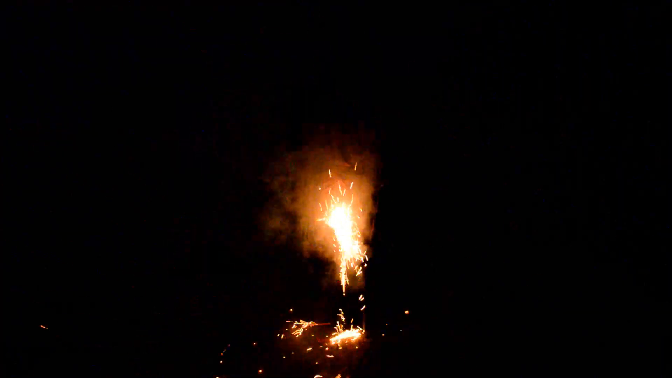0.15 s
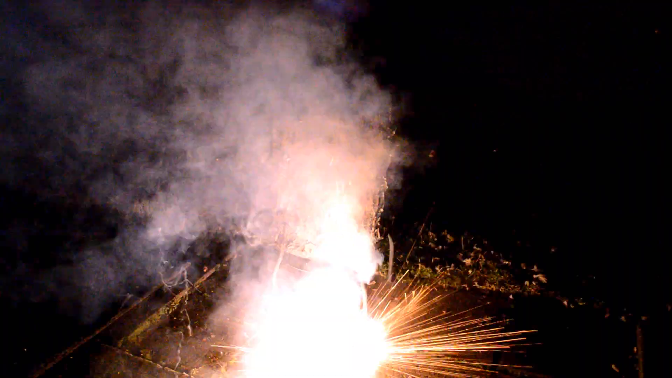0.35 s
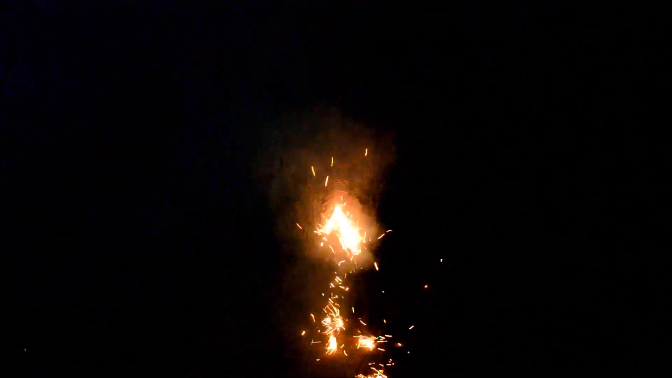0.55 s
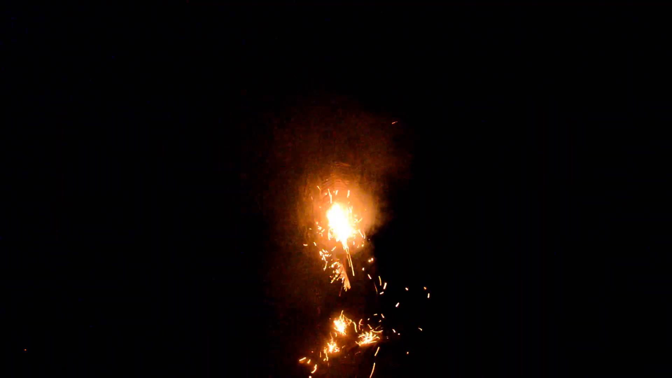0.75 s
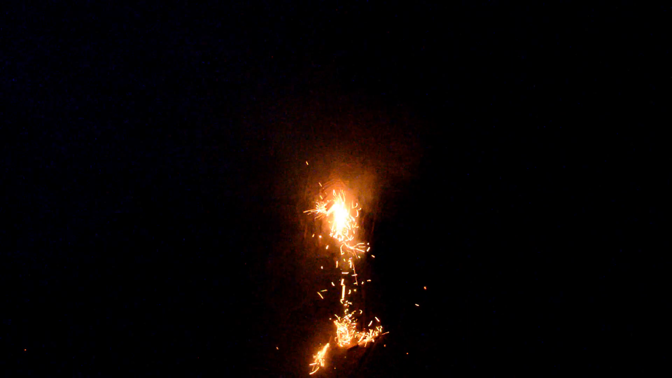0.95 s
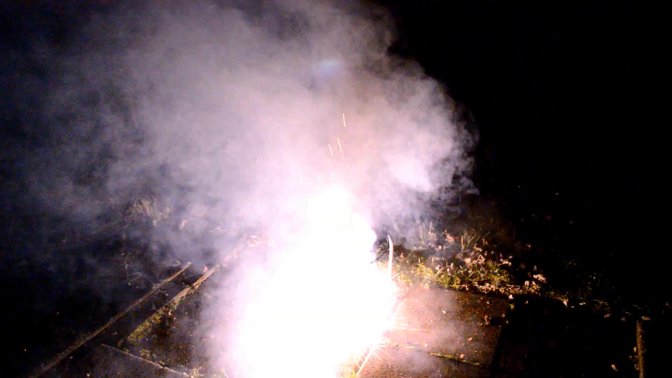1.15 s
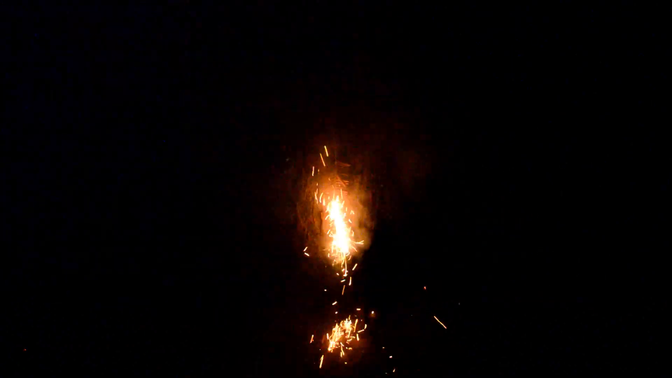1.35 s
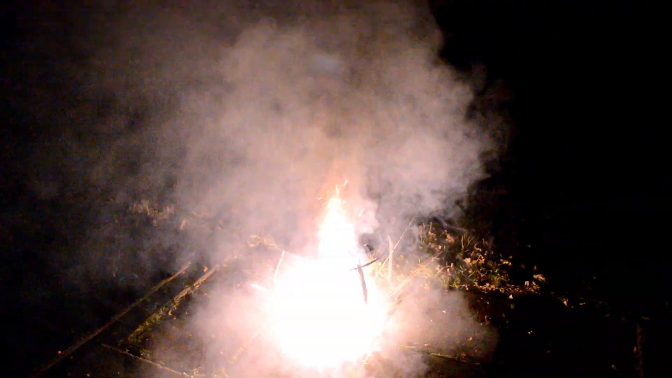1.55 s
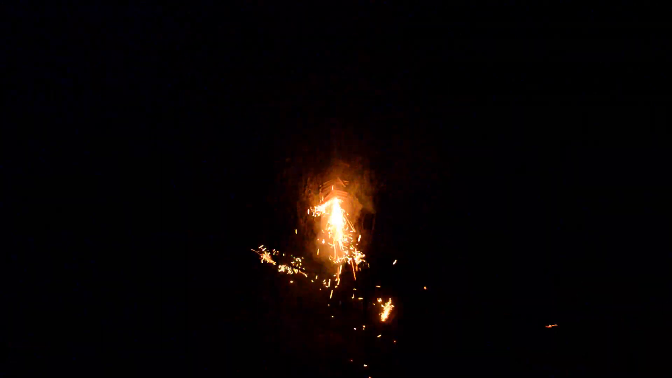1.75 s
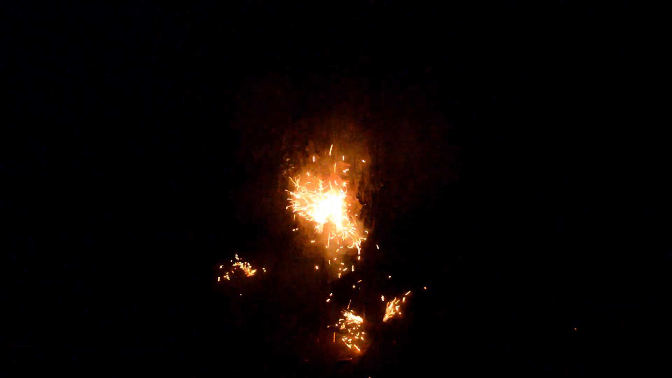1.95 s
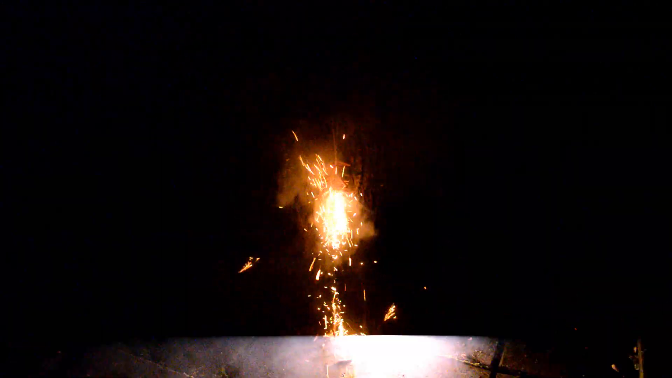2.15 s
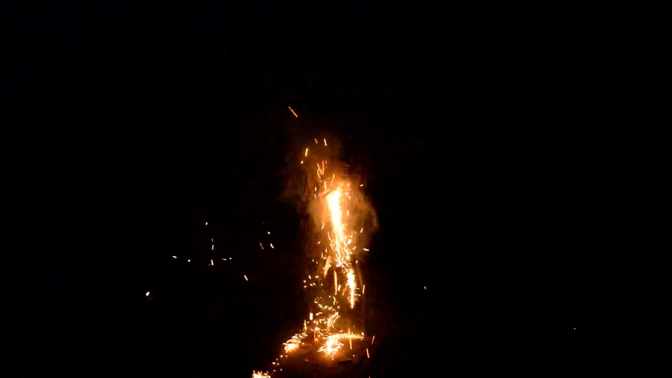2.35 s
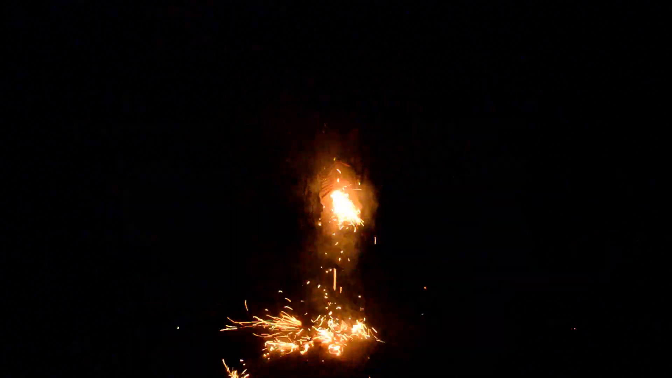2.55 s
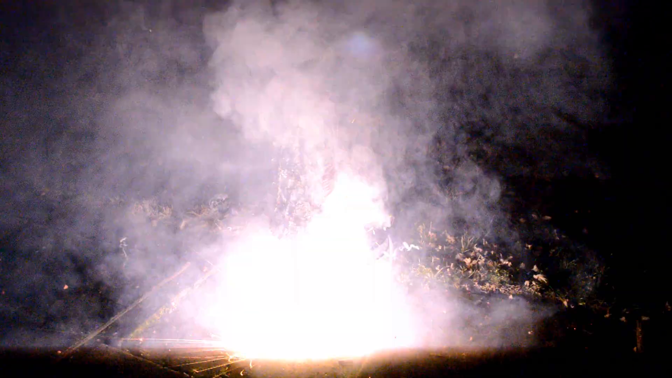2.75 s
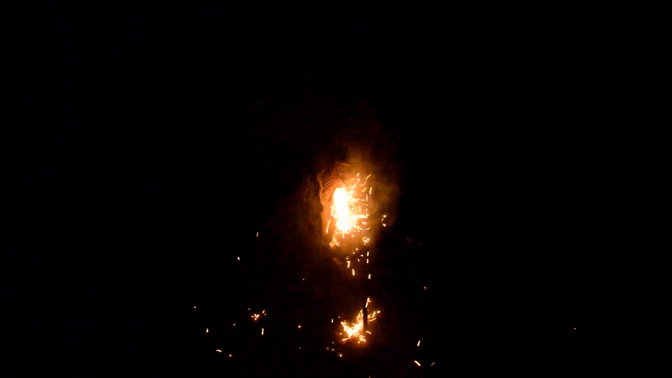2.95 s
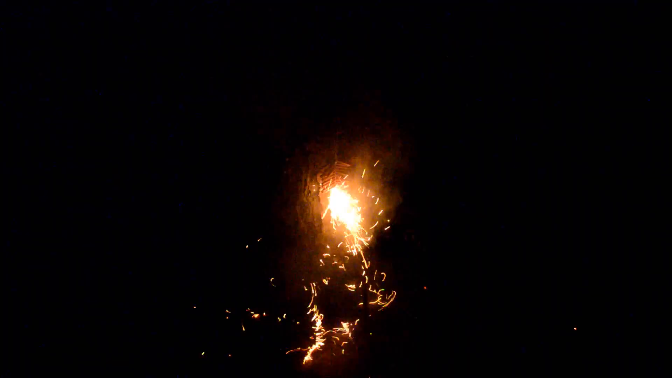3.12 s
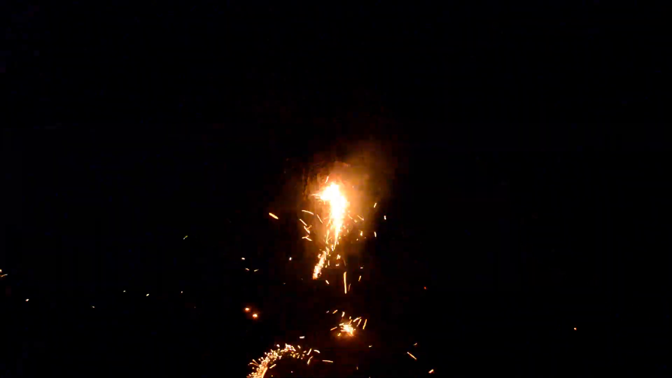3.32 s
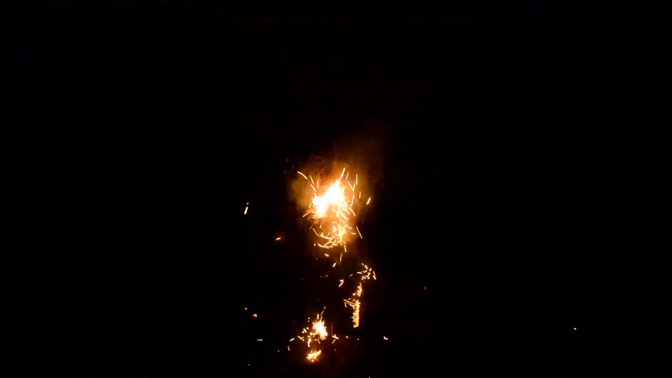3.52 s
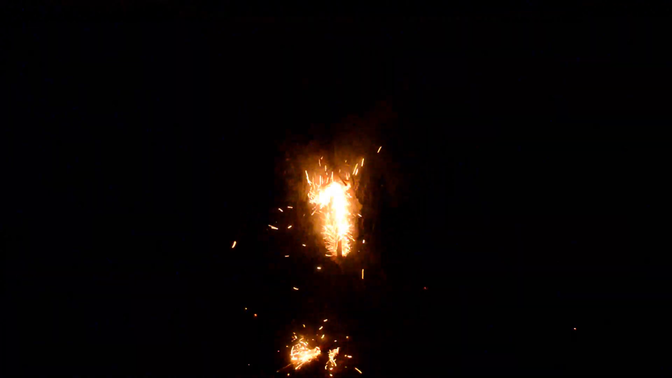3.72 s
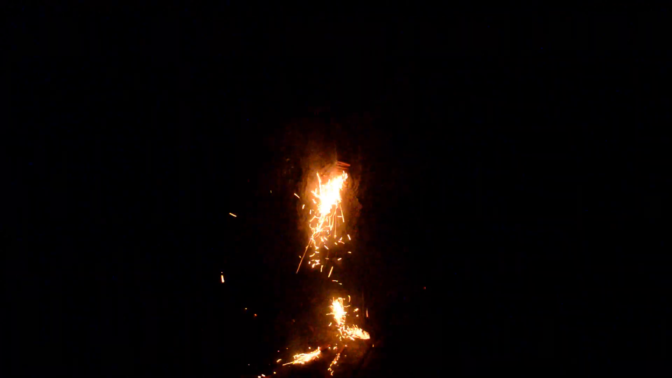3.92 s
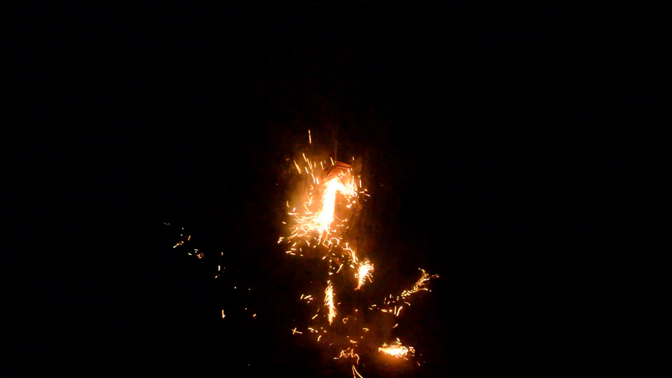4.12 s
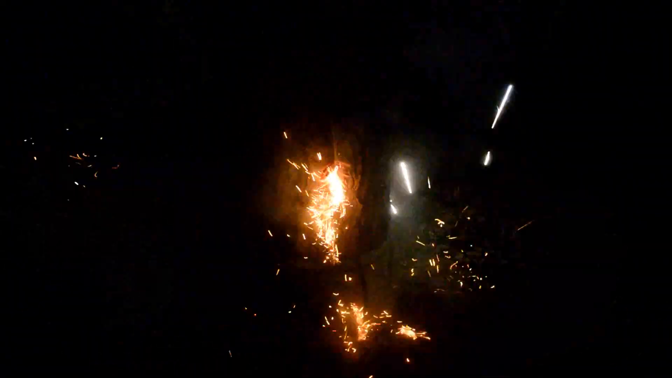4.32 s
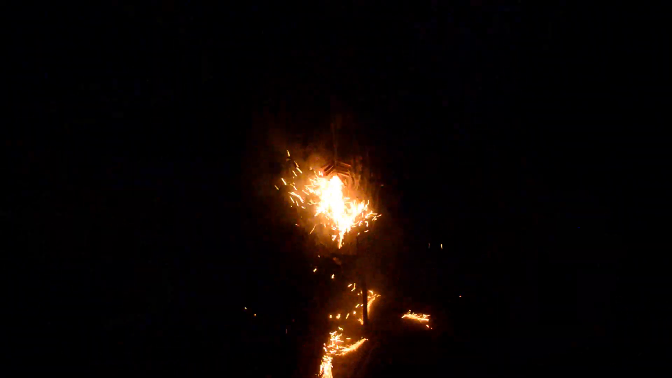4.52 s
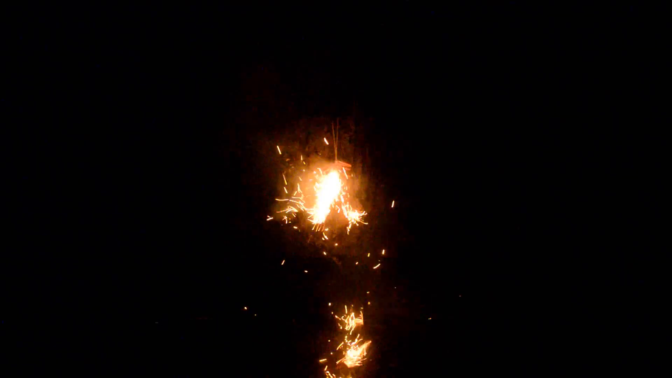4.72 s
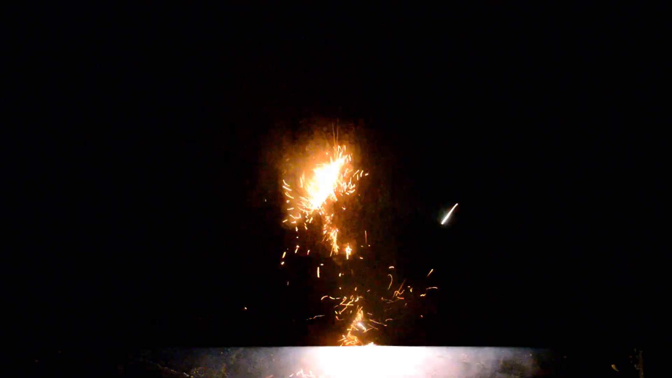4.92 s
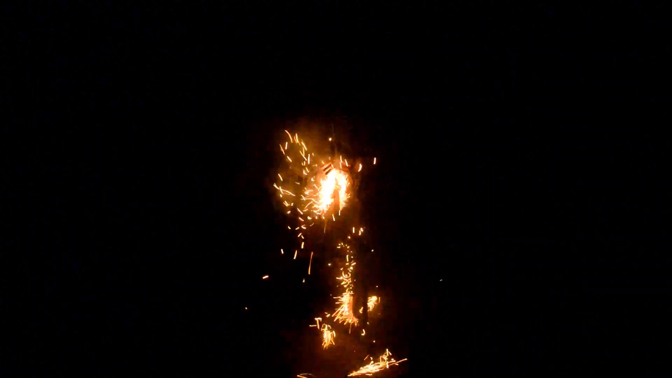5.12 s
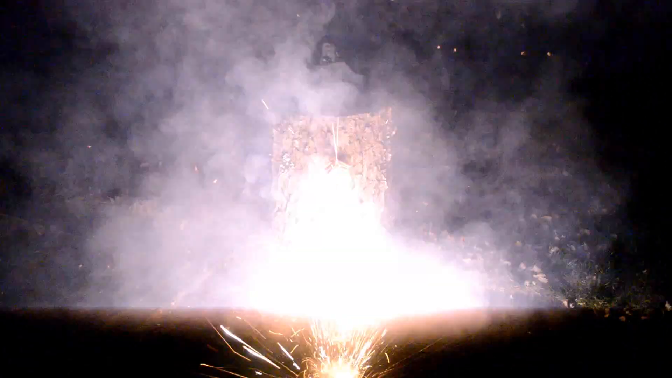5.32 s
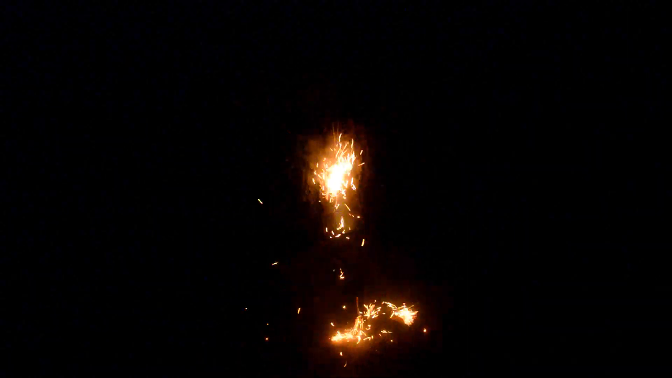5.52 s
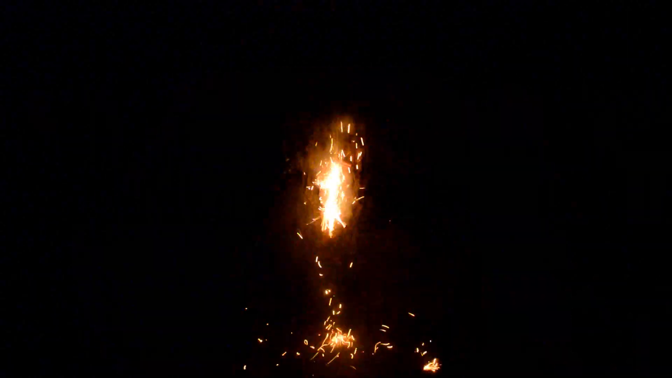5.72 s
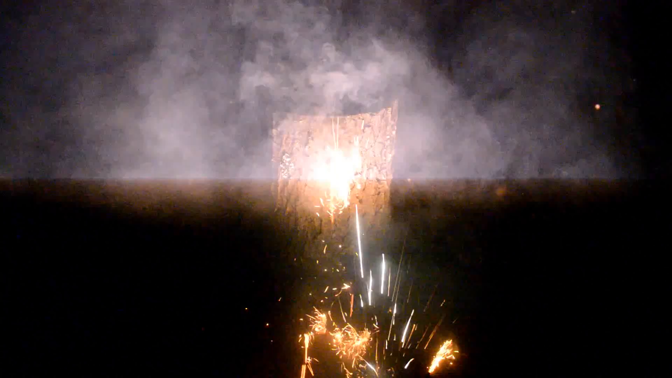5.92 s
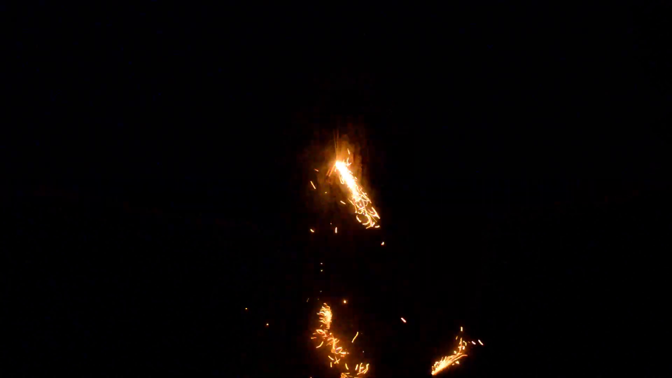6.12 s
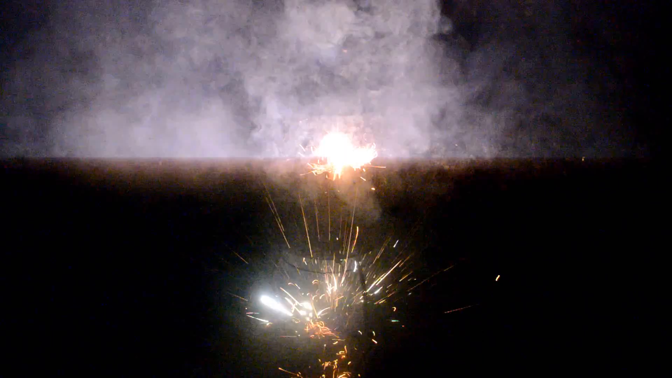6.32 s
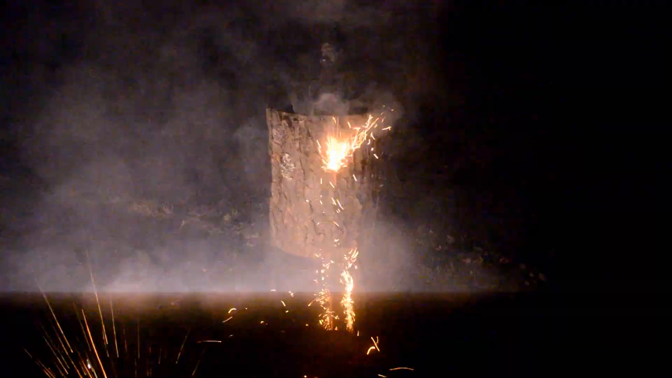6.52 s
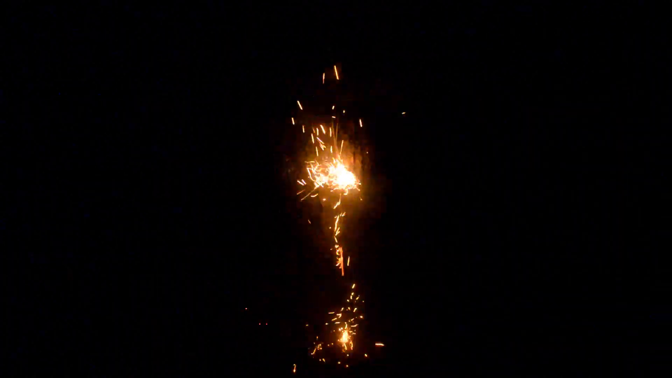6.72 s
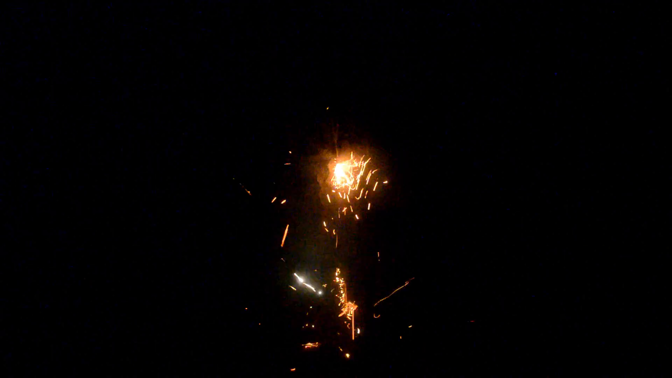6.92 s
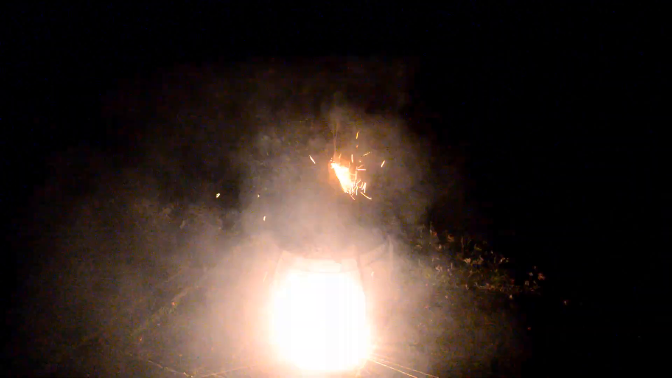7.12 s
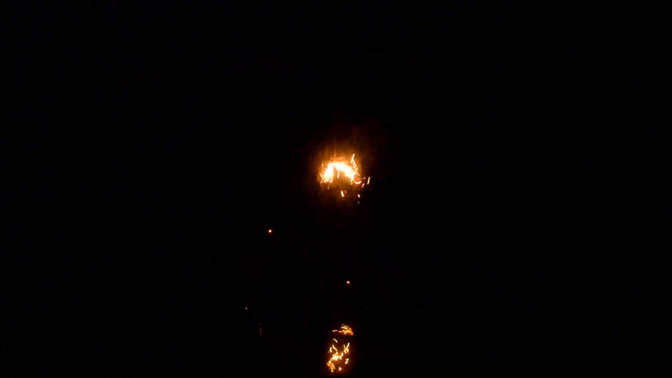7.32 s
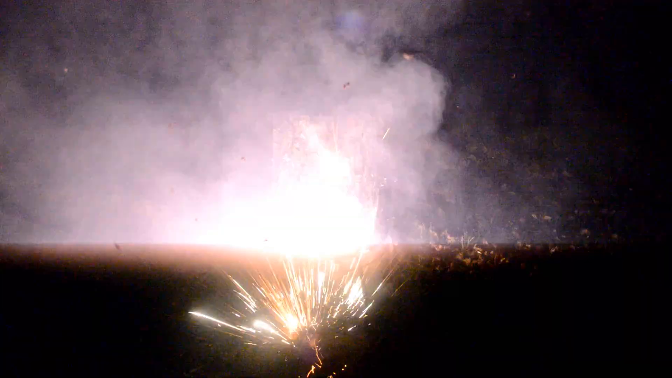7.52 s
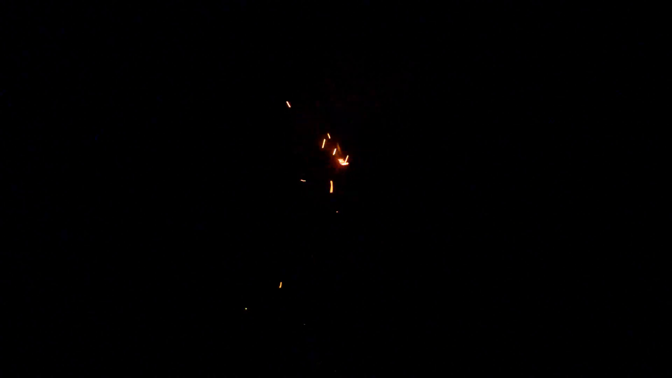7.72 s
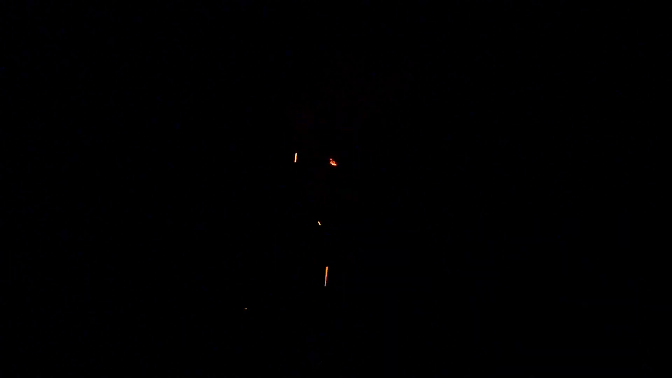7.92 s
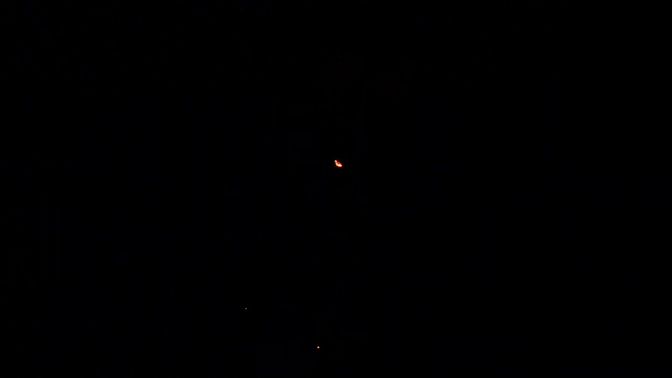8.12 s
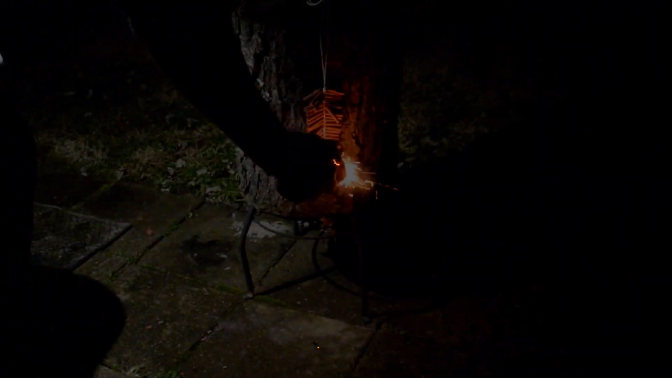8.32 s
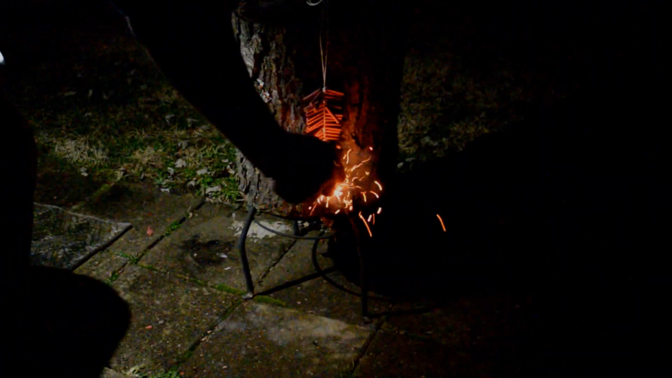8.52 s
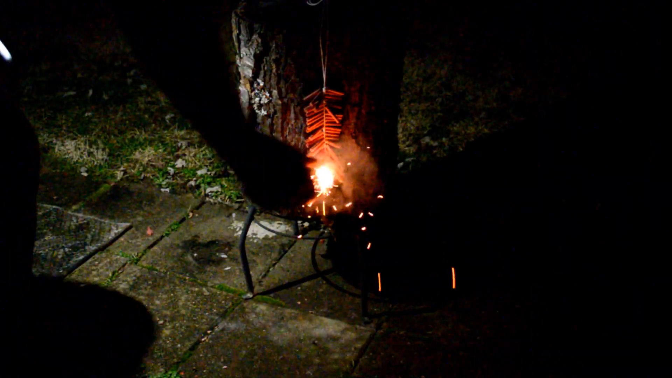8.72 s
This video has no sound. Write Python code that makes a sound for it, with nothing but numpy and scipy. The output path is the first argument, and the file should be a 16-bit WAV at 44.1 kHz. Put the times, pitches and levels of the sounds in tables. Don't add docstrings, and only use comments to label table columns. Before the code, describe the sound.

Close, overloaded firecracker cracks burst irregularly in a paved yard, with quick echoes from walls and a long diffuse tail over the neighbourhood. Automatic gain pumps: each bang pushes the background down, then burning hiss creeps back. Small sparks snap in the gaps. About eight seconds in, the bangs are over and the scene shifts to soft night ambience, a high cricket chirp and a fizzing fuse catching.

```python
import sys
import numpy as np
from scipy import signal
from scipy.fft import rfft, irfft
from scipy.io import wavfile
from scipy.ndimage import uniform_filter1d

SR = 44100
rng = np.random.default_rng(int(sys.argv[2]) if len(sys.argv) > 2 else 0)


def put_to_file(sound):
    columns = np.atleast_2d(sound).T
    safe = np.clip(columns, -1, 1)
    whole_steps = np.round(safe * 32767)
    wavfile.write(sys.argv[1], SR, whole_steps.astype(np.int16))


def gain_from_db(level_db):
    decades = np.asarray(level_db, float) / 20
    return 10 ** decades


N = 390726

# (time [s], blast in the overloaded capsule [dB], thump [dB], charge as the yard hears it [dB], answer of the
# house fronts [dB])
CRACKER_STRING = [(0.008, 7, -25.5, 2.5, -26), (0.08, 0, -24.5, -2, -13), (0.316, 8, -32, 5, -1.5),
                  (0.474, 10, -26.5, 1, -13), (0.491, 1, -34, -2.5, -17), (0.542, 4.5, -33, -1.5, -12),
                  (0.801, 9.5, -27.5, 3.5, -0.5), (1.273, 5, -19, 1, -10), (1.33, 3, -29, 1.5, -3),
                  (1.653, -1.5, -17, 2.5, -27), (1.674, 1.5, -19, -6, -1.5), (2.301, 1, -21.5, 3, -15),
                  (2.362, 3, -25, 3, 1), (2.609, 3, -24, 2, -9), (2.718, 7, -26.5, 2, -4),
                  (2.869, 4.5, -27.5, 1.5, -7.5), (3.2, 6.5, -30, 4.5, 0.5), (3.354, 7.5, -29.5, 4, -2),
                  (3.476, 7.5, -28, 0, -6.5), (4.172, 8.5, -29, 5.5, -7),
                  (4.301, 0.5, -29, -3.5, -31), (4.395, 1.1, -23, 1.5, -6), (4.404, 2.6, -33, -17, -22),
                (4.775, 6.6, -23, 4.5, 0), (5.009, 4.3, -28, 1, -21), (5.071, 2.8, -26, -1, -5.5),
                (5.3, 8.5, -29, 4, -17), (5.344, 11.2, -31.5, -3, -16), (5.435, 6.2, -30, 0.5, -9),
                (5.719, 3.8, -30.5, 1.5, -2.5), (5.967, 6.1, -27, 3.5, -15), (6.026, 7.6, -22, 0, -5),
                (6.322, 5.8, -26, 4, -10), (6.425, 7.2, -21, 2, -5.5), (6.596, 3.6, -23, -5, -23),
                (6.636, 1.4, -17.5, 0, -23), (7.005, 8, -26, 5.5, 1), (7.252, 0.99, -28, 0.5, -6.5),
                (7.554, 8.1, -23.5, 3.5, -8), (7.633, 6.9, -29, 2, -2)]
CRACKERS = CRACKER_STRING
# (frequency [Hz], level per Hz [dB])
BLAST_TONE = [(88, -25), (150, -5), (543, -6), (1600, 0.5), (1890, -1), (2470, 0), (3340, -1), (6990, -6),
              (12600, -19), (13800, -47)]
# (frequency [Hz], level per Hz [dB])
ROLL_TONE = [(65, -65), (110, -16), (164, -22.5), (205, -15), (312, -14.5), (422, -10.5), (457, -10),
             (1200, -3), (2280, -5.5), (6720, -16), (11600, -32.5), (13300, -43)]


def colour(x, spectrum):
    hz, db = np.transpose(spectrum)
    bins_hz = np.maximum(np.arange(2049) * SR / 4096, 1)
    cepstrum = irfft(np.interp(np.log(bins_hz), np.log(hz), db) * np.log(10) / 20)
    cepstrum[1:2048] *= 2
    cepstrum[2049:] = 0
    taps = irfft(np.exp(rfft(cepstrum)))
    return signal.fftconvolve(x, taps / np.sqrt(np.sum(taps ** 2)))[:len(x)]


def band(x, lo_hz, hi_hz, order=2):
    sos = signal.butter(order, [lo_hz, min(hi_hz, .45 * SR)], "band", fs=SR, output="sos")
    return signal.sosfilt(sos, x)


def unit(x):
    return x / np.sqrt(np.mean(x ** 2))


def flutter(rate_hz, db):
    hold = int(SR / rate_hz)
    steps = np.repeat(rng.standard_normal(N // hold + 1), hold)
    return gain_from_db(db * uniform_filter1d(steps, hold)[:N])


def puff(ms, at_ms, smear_ms):
    return (ms >= at_ms) * np.exp(-np.maximum(ms - at_ms, 0) / max(smear_ms, .2))


def add(out, s, piece):
    i = int(s * SR)
    out[i:i + len(piece)] += piece[:N - i]


def hiss(spectrum, spit_db=-2.0, flicker_db=0.2):
    grains = rng.standard_normal(N) * gain_from_db(spit_db * rng.exponential(size=N))
    return unit(colour(grains, spectrum)) * flutter(35, flicker_db)


def burning_string(t):
    # (frequency [Hz], level per Hz [dB])
    fuse_tone = [(2470, 2.5), (4200, 5.5), (4600, 7), (5000, 2.5), (6840, 8), (12700, -2.5), (13300, -10)]
    # (time [s], hiss level [dB])
    burn = [(0.0, 0.5), (0.33, -64), (0.55, -33), (1.23, -27), (1.9, -29), (2.0, -25), (2.9, -31),
            (3.8, -29), (3.92, -25), (4.9, -24.5), (5.8, -33), (6.1, -32), (6.7, -26), (7.6, -27),
            (7.72, -53), (8.3, -48.5)]
    return gain_from_db(np.interp(t, *np.transpose(burn))) * hiss(fuse_tone)


def hum(t):
    rumble = unit(band(rng.standard_normal(N), 30, 135))
    mains = np.sin(2 * np.pi * 59.5 * t) * flutter(12, 0.92)
    return gain_from_db(-51.5) * (mains + gain_from_db(-5) * rumble)


def gain_control(t):
    dive_s, hold_s, recover_s = 0.006, 0.069, 0.44
    dive = np.interp(t, (0, recover_s), (.9, 0))
    for s, *_ in CRACKERS:
        shape = np.interp(t - s, (0, dive_s, hold_s, hold_s + recover_s), (0, 1, 1, 0))
        dive = np.maximum(dive, shape)
    return gain_from_db(-19 * dive)


def bangs():
    # (delay [ms], level [dB], smear [ms])
    near_echoes = [(9.88, -18.5, 4.4), (17.9, -26, 4), (28.65, -22.5, 0.61), (39.25, -25.5, 2.6)]
    # (delay [ms], level [dB], smear [ms])
    wall_echoes = [(70.4, 1.5, 7), (89.4, -4, 9.6), (100.7, -1.5, 80), (106.5, 3, 1.1), (140, -5.5, 1.8),
                   (150, -10, 1.5), (201, -17, 30)]
    surfaces = near_echoes + wall_echoes
    ms = np.arange(SR // 3) * 1000 / SR
    crack, sizzle, thump, near, walls = np.zeros((5, N))
    for s, db, thump_db, charge_db, _ in CRACKERS:
        s += .0008
        shock = puff(ms, 0, 3.4 - 0.09 * db)
        grit = rng.standard_normal(len(ms))
        lumps = uniform_filter1d(rng.standard_normal(len(ms)), size=30) * np.sqrt(30)
        grit *= gain_from_db(3.23 * lumps)

        echoes = []
        for delay_ms, echo_db, smear_ms in surfaces:
            luck, shift = rng.standard_normal(2)
            level = gain_from_db(echo_db + np.clip(0.47 * luck, -4, 2))
            at_ms = delay_ms + 0.0041 * delay_ms * shift + 0.46 * shift
            echoes.append(level * puff(ms, at_ms, smear_ms))
        close = sum(echoes[:len(near_echoes)]) + gain_from_db(-15.5) * puff(ms, 0.72, 17.5)
        distant = sum(echoes[len(near_echoes):])

        sizzle_db = db + 1.5 + 0.9 * rng.standard_normal()
        add(crack, s, gain_from_db(db + 1.0) * grit * shock)
        add(sizzle, s, gain_from_db(sizzle_db) * grit * (gain_from_db(-2.0) * shock + gain_from_db(-6.5) * close))
        add(near, s, gain_from_db(db) * grit * close)
        add(walls, s, gain_from_db(charge_db - 5.5) * grit * distant)
        add(thump, s, gain_from_db(db + thump_db + 29) * (1 - ms / 1.3) * np.exp(-ms / 1.07))
    air = band(crack, 217, 5830, order=1) + band(sizzle, 4430, 22500) + band(near, 330, 4800, order=1)
    blasts = colour(air, BLAST_TONE) + gain_from_db(-5) * band(thump, 64, 280, order=1)
    return gain_from_db(1.5) * blasts, colour(walls, ROLL_TONE)


def roll():
    # (frequency [Hz], time to fade by 60 dB [s])
    fade_times = [(150, 1.12), (400, 0.74), (1000, 1.44), (3000, 1.07), (7000, 0.6), (12000, 0.43)]
    t = np.arange(2 * SR) / SR
    fade_hz, fade_s = np.transpose(fade_times)
    yard = 0
    for hz in 140 * 2 ** np.arange(0, 7, .5):
        t60 = np.interp(np.log(hz), np.log(fade_hz), fade_s)
        noise = band(rng.standard_normal(len(t)), hz / 2 ** .25, hz * 2 ** .25)
        yard = yard + noise * gain_from_db(-60 * (t - .15) / t60)
    yard = yard * (1 - 0.57 * np.exp(-(t / 0.096) ** 2))
    far = band(rng.standard_normal(len(t)), 490, 1650, order=1) * gain_from_db(-15.5 - 60 * t / 7.8)
    far *= np.minimum(t / 0.24, 1) * (1 + 0.7 * np.exp(-((t - .52) / 0.091) ** 2))
    answer = colour(yard + far, ROLL_TONE)
    charges = np.zeros(N)
    for s, _, _, charge_db, _ in CRACKERS:
        charges[int(s * SR)] = gain_from_db(charge_db - 7.5)
    return signal.fftconvolve(charges, answer)[:N] * flutter(60, 1.4)


def blooms(t):
    ms = t[:SR // 2] * 1000 - 116
    rise_ms, fall_ms = 21.5, 75
    swell = np.zeros(N)
    shape = np.exp(-(ms / np.where(ms < 0, rise_ms, fall_ms)) ** 2)
    for s, *_, house_db in CRACKERS:
        add(swell, s, gain_from_db(house_db - 19.5) * shape)
    return swell * unit(band(rng.standard_normal(N), 800, 2300)) * flutter(150, 3)


def slaps():
    # (delay [ms], peak level [dB], smear [ms])
    flat_walls = [
        (105, 0, 3.1),
        (149.8, -8.5, 5.3),
    ]
    out, ms = np.zeros(N), np.arange(SR // 10) * 1000 / SR
    for s, *_, house_db in CRACKERS:
        for delay_ms, db, smear_ms in flat_walls:
            slap = rng.standard_normal(len(ms)) * puff(ms, 0, smear_ms)
            add(out, s + delay_ms / 1000, gain_from_db(house_db + db - 9.5) * slap)
    return colour(band(out, 600, 8900), BLAST_TONE)


def snaps():
    # (time [s], peak level [dB], lowest frequency [Hz], length [ms])
    clicks = [(.9097, -38, 5000, 2), (1.246, -17, 7130, 12), (3.116, -11.5, 4900, 9.5),
              (3.611, -31, 3000, 2.2), (6.944, -26, 7000, 2), (7.7464, -21, 3500, 2.2),
              (8.2074, -33, 6500, 1.5), (8.2172, -43, 7000, 1.6), (8.2467, -37, 6500, 2.2),
              (8.2727, -36, 6500, 1.6), (8.65, -14.5, 2880, 2.2)]
    out, ms = np.zeros(N), np.arange(SR // 20) * 1000 / SR
    for s, db, low_hz, length_ms in clicks:
        burst = rng.standard_normal(len(ms)) * puff(ms, 0, length_ms)
        click = band(burst, low_hz, 1.7 * low_hz, order=1)
        add(out, s, gain_from_db(db + 5) * click / np.abs(click).max())
    return out


def cricket(t):
    # (time [s], level [dB])
    chirp_levels = [
        (8.33, -66),
        (8.4, -50),
        (8.5, -43),
        (8.62, -44),
        (8.86, -50),
    ]
    throb = np.maximum(np.cos(2 * np.pi * 48 * (t - 8.431)), 0) + .35
    tone = np.sin(2 * np.pi * 5730 * t)
    return gain_from_db(np.interp(t, *np.transpose(chirp_levels))) * throb * tone * flutter(70, 4.3)


def fresh_fuse():
    # (frequency [Hz], level per Hz [dB])
    sputter_tone = [(590, -27), (1000, -16), (1690, -15), (2870, -3), (3240, -16), (4460, -7), (10500, -19),
                    (13800, -21)]
    # (frequency [Hz], width [Hz], level [dB])
    resonances = [(780, 94, 4.5), (1270, 47, 2), (2250, 47, 7), (2950, 290, -3), (3360, 42, -1),
                  (3660, 39, 6.5), (4370, 310, -2), (5700, 72, -2), (6100, 94, 1), (6800, 170, -1),
                  (7800, 63, 0), (8400, 110, -20), (8980, 86, -16), (10400, 85, -3), (12100, 61, -13),
                  (13100, 97, -13)]
    powder = hiss(sputter_tone, spit_db=1.5, flicker_db=.8)
    white = rng.standard_normal(N)
    ringing = np.zeros(N)
    for hz, width_hz, db in resonances:
        ring = band(white, hz - 0.32 * width_hz - 25, hz + 0.69 * width_hz + 25, order=1)
        ringing += gain_from_db(db) * np.sqrt(width_hz) * unit(ring) * flutter(17, 3.5)
    return gain_from_db(-2.5) * powder + gain_from_db(-0.5) * unit(ringing)


def lighting(t):
    # (time [s], night air level [dB], fresh fuse level [dB])
    catching = [(8.1, -39, -47), (8.35, -31.5, -37), (8.5, -35.5, -39), (8.601, -34, -32.5),
                (8.7, -34.5, -31.5), (8.78, -37.5, -27), (8.86, -39, -27)]
    # (frequency [Hz], level per Hz [dB])
    night_tone = [(53, -45.5), (90, -41), (192, -18), (302, -19.5), (452, -20), (582, -7), (632, -10.5),
                  (1030, -16.5), (2870, -16), (3230, -31), (5000, -30), (6500, -47), (11000, -120)]
    s, air_db, fuse_db = np.transpose(catching)
    night = unit(colour(rng.standard_normal(N), night_tone)) * flutter(37, 1.8)
    air = gain_from_db(np.interp(t, s, air_db)) * night
    return air + gain_from_db(np.interp(t, s, fuse_db)) * fresh_fuse() + cricket(t)


def scene():
    # (start [s], end [s])
    dissolve = (8.3, 8.47)
    t = np.arange(N) / SR
    gain = gain_control(t)
    blasts, walls = bangs()
    returns = (walls + roll()) * gain_from_db(-2)
    yard = band(gain * (returns + burning_string(t)), 125, 16000, order=4)
    houses = band(slaps() + blooms(t), 130, 15000, order=3)
    ducked_hum = np.minimum(1.76 * gain, 1) ** 2 * hum(t)
    fade = np.interp(t, dissolve, (1, 0))
    mix = blasts + yard * fade + ducked_hum + lighting(t) * (1 - fade) + houses + snaps()
    return mix[None]


def band_limit(x):
    return signal.sosfilt(signal.butter(12, 13970, fs=SR, output="sos"), x)


def record(dry):
    clipped = np.clip(dry, -.97, .97)
    low_pass = signal.ellip(6, .2, 24, 13350, fs=SR, output="sos")
    mix = signal.sosfilt(low_pass, clipped)
    return band_limit(mix)


dry = scene()
out = record(dry)
put_to_file(out)
```